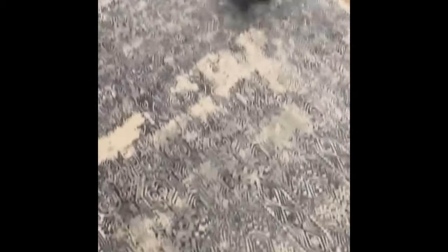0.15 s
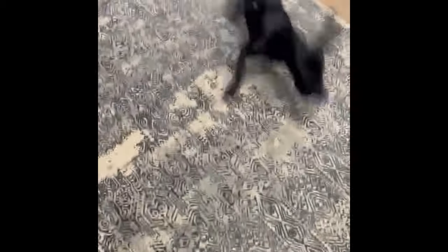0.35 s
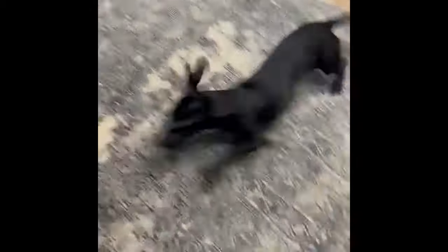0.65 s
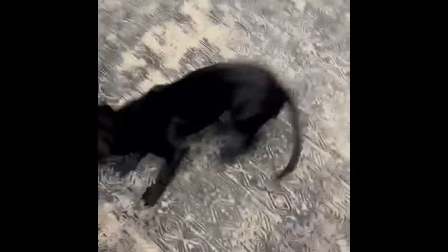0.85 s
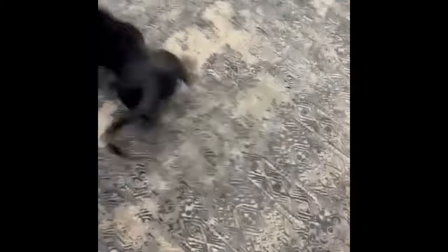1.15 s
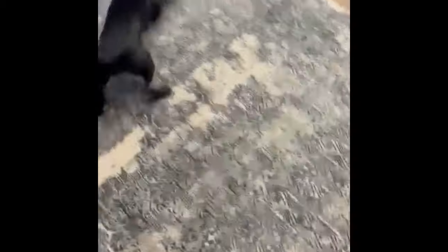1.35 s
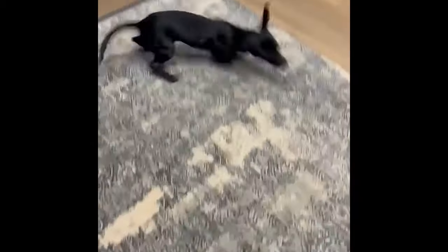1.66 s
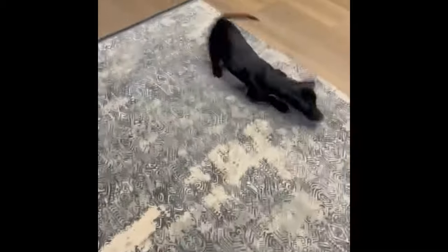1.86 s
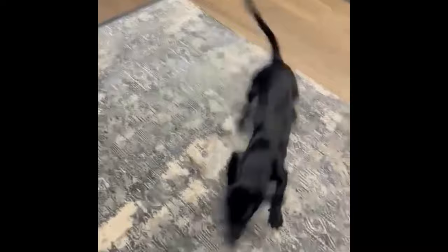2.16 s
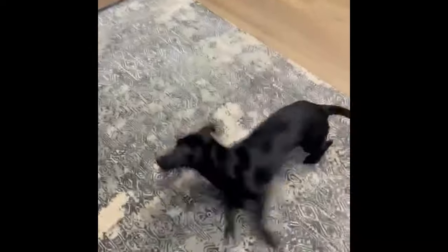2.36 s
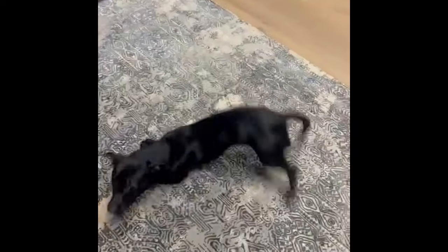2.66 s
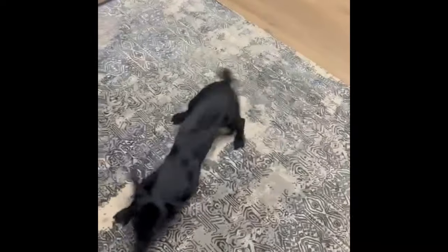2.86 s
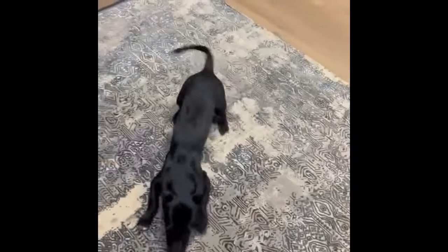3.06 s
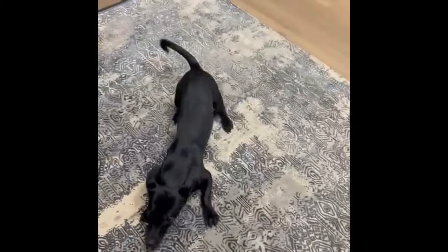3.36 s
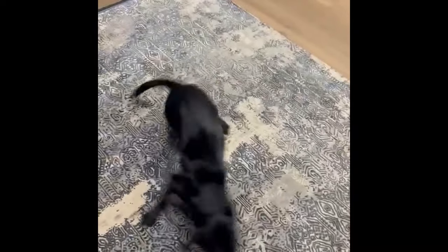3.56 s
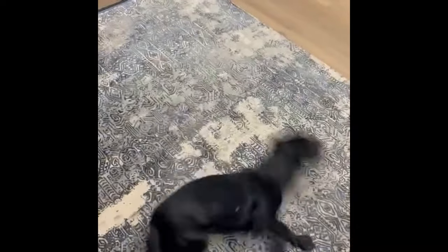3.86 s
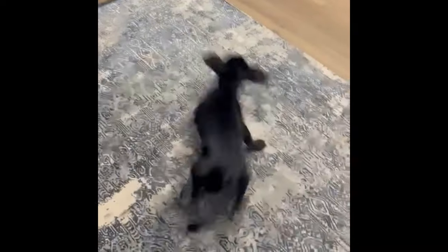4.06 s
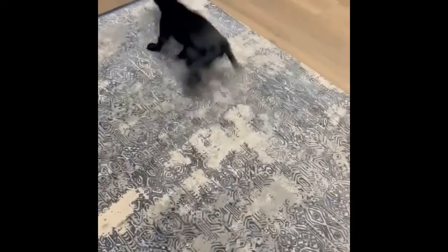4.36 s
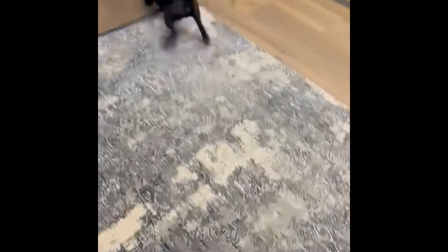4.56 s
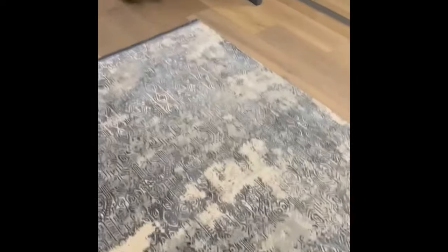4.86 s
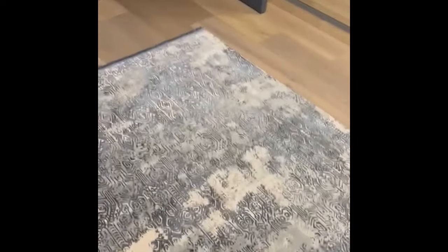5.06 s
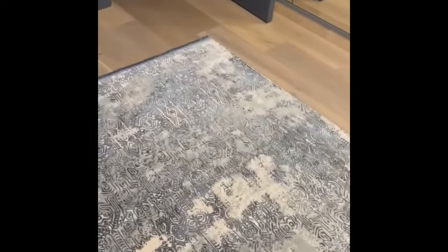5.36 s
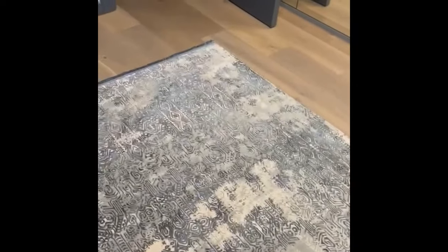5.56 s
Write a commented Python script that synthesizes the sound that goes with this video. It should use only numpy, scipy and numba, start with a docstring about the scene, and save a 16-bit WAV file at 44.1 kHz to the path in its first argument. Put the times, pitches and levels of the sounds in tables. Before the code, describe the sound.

A small puppy plays on a rug in a living room, heard a metre or two from a hand-held phone, with short room echo and faint steady air. Light scuffs and dry claw ticks start at once, quickening from 0.25 to 0.5 s. The first rough growl-bark runs 0.55-1.1 s, raspy, throaty and fluttering. Claws knock between growls. A second, jerky with hard pushes, lasts 1.5-2.1 s; a third, lower, louder and longer, 2.25-2.95 s, ends among three quick ticks near 2.9. From 3 to 3.7 s it is quieter: soft paw thuds, clustered at 3.5-3.65, and faint scuffing. The fourth growl, low and coarse, fills 3.75-4.45 s. Scuffs follow as the puppy runs off, and something thin rustles in bright, crisp bursts, strongest at 4.64 and again at 4.92, then weaker to the end, with tiny bright clicks around 5.5 s.

```python
"""Puppy growling on a rug

A small puppy dashes about in a living room, a metre or two from a hand-held phone.
Its four rough growl-barks are uneven throat pulses and breath ringing chest, mouth and muzzle.
Claws tick as short knocks that ring the floorboards; paws thud softly and scuff the rug as noise.
As it runs off, something thin rustles in bursts of bright noise; room echo and faint air surround it.
"""
import sys
import numpy as np
from scipy import signal
from scipy.fft import rfft, irfft, next_fast_len
from scipy.io import wavfile
from scipy.ndimage import uniform_filter1d
from numba import njit

SR = 44100
rng = np.random.default_rng(int(sys.argv[2]) if len(sys.argv) > 2 else 0)


def unload_audio(sound):
    """Save the sound as a 16-bit wav file, at the path given as the first command line argument."""
    columns = np.transpose(np.atleast_2d(sound))
    # keep every value between -1 and 1, then stretch to whole-number steps
    steps = np.round(np.clip(columns, -1, 1) * 32767)
    wavfile.write(sys.argv[1], SR, steps.astype(np.int16))


N = 251811
TIME_S = np.arange(N) / SR


def growl():
    """Throat pulses and breath ring the head and chest; loose tissue flaps and chops it to a rattle."""
    # One table a growl. Levels after the chest's are relative to it, before the trims below:
    # t/s, chest level/dB, jaw, mouth, muzzle, nose, snarl and treble breath level/dB,
    # jaw f/Hz, mouth f/Hz, nose f/Hz, snarl f/Hz
    growl_paths = [
        [(0.559, -37, -12.5, -4.5, 0, -5.5, -16, -20, 342, 742, 2087, 2975),
         (0.575, -35, 2.5, 0.5, 6, -31.5, -24, -21, 341, 757, 2196, 2967),
         (0.611, -37.5, 11, 3.5, -7.5, -5, -7, -21, 339, 670, 2370, 3100),
         (0.667, -36, -3.5, -2.5, 11, -17.5, -11.5, -16, 348, 732, 2460, 2815),
         (0.729, -32.5, 5, 0.5, -3, -15.5, -25, -28.5, 348, 739, 1990, 3150),
         (0.785, -31.5, 10, -0.5, -8, -17, -22, -26, 384, 712, 2110, 3250),
         (0.857, -34.5, 2.5, 10.5, -2.5, -21, -24.5, -23, 363.8, 715, 2040, 3470),
         (0.935, -35.5, 9.5, 2, -5.5, -13, -20, -22.5, 372.3, 589.4, 2060, 2943),
         (0.989, -36, 0.5, -2.5, -14.5, -11, -45, -24, 376, 726, 2014, 2970),
         (1.057, -39.5, -11, -24, -17, -34, -42, -34, 319, 670, 2040, 2982),
         (1.14, -55.5, 7, -9, -10, -3, -17, -37, 348.3, 667, 2123, 3268)],
        [(1.495, -41.5, 7, 0, -9.5, -27, -16, -19.5, 368, 736, 2082, 2902),
         (1.533, -33, 0.5, -8, -10.5, -21, -27, -25, 352.4, 757, 2017, 3000),
         (1.571, -42, 10.5, 4.5, -1.5, -7.5, -42, -17.5, 350.7, 750, 2075, 2956),
         (1.623, -33.5, -1, -3, -6.5, -17, -11, -23, 350.4, 705, 2533, 2830),
         (1.705, -38, 0.5, 0, -10.5, -10, -23, -21.5, 327, 712, 2048, 3090),
         (1.769, -34.5, 5, 5.5, -7, -12.5, -19, -23.5, 353, 713, 2430, 2960),
         (1.825, -33.5, 3, 15.5, 6, -18, -24, -21, 381, 719, 2154, 2945),
         (1.879, -35, 3.5, 6.5, 1, -11, -27.5, -23, 353.6, 721, 2097, 3050),
         (1.977, -35, 4, 1, -4.5, -13.5, -13.5, -24.5, 342, 690, 2320, 3397),
         (2.033, -43.5, -6.5, -0.5, -7.5, -12.5, -23, -22, 342, 733, 2534, 3314),
         (2.14, -63.5, -8.5, -6.5, 5, 3, 1, -31.5, 355.5, 694, 2375, 2998)],
        [(2.248, -40, 14.5, 13.5, 5, -6.5, -22, -18, 356, 665.6, 2160, 2845),
         (2.268, -32.5, -3.5, 12, 10.5, -10, -29, -19, 354.4, 622, 2240, 2876),
         (2.348, -29, 0.5, 9, 1.5, -8, -18, -22, 388, 672, 2513, 3126),
         (2.386, -37.5, 7.5, 12.5, 12.5, -7, -8, -16.5, 391, 637.6, 2470, 3370),
         (2.42, -34.5, -5.5, 1.5, -5, -12.5, -19, -24.5, 346, 659, 2270, 2960),
         (2.55, -30.5, -5, -2, 1, -14, -9, -26.5, 347, 796, 2300, 2704),
         (2.614, -30.5, 4.5, -3, 5.5, -14, -19, -21.5, 380, 688, 1887, 3736),
         (2.654, -34.5, 2.5, 14.5, 0.5, -8.5, -12, -19, 354, 608, 1870, 3485),
         (2.74, -28.5, -2, -8.5, -11, -21, -25.5, -32, 374, 666, 2195, 3795),
         (2.842, -37, -8.5, -1, -19, -6.5, -17, -26.5, 330, 657, 2018, 3156),
         (3.0, -63, -1.5, 4.5, 7, 3.5, -12, -9, 363.6, 680, 2080, 2923)],
        [(3.754, -39.5, 15, 5, -1, -5, -19, -16, 328.5, 654, 2346, 2960),
         (3.794, -31, -1, 16, -1, -14, -26, -26.5, 356, 713.4, 2378, 3210),
         (3.85, -28, 4, 14, 4, -13, -14.5, -19.5, 375, 601.6, 2074, 3710),
         (3.95, -31.5, -1.5, 12.5, -3.5, -11.5, -23, -20.5, 343, 644, 2090, 3644),
         (4.008, -36.5, 5, 9.5, 7.5, -4.5, -14, -17.5, 371.4, 602, 1940, 3340),
         (4.086, -35.5, 7, 12.5, 1, -10.5, -13.5, -24, 383, 632, 2400, 3290),
         (4.205, -35, -0.5, -1, -4, -9, -12, -24.5, 350, 732, 2236, 2965),
         (4.284, -36, -10.5, -20, -15.5, -24, -27, -26.5, 357, 691, 2200, 3145),
         (4.314, -30, 3, 1, -3, -13.5, -24, -29, 346.5, 675, 2050, 3313),
         (4.382, -41.5, -6.5, -8.5, -5.5, -15, -21, -27.5, 323.7, 717, 2026, 3350),
         (4.45, -54.5, 1, 1, 3, -19, -17, -47, 361, 697, 2077, 3260)],
    ]
    (chest_db, jaw_db, mouth_db, muzzle_db, nose_db, snarl_db, treble_db,
     jaw_hz, mouth_hz, nose_hz, snarl_hz) = read(growl_paths)
    # Moving muzzle resonance as the lips draw back, one table a growl: t/s, f/Hz
    muzzle_path = [
        [(0.57, 1050), (0.654, 1140), (0.716, 986), (0.76, 1062), (0.796, 926), (0.854, 943), (1.0, 1058)],
        [(1.5, 944), (1.552, 926), (1.592, 1081), (1.74, 1005), (1.762, 1080), (2.0, 958)],
        [(2.25, 1010), (2.37, 1070), (2.4, 999), (2.602, 910), (2.78, 1143), (2.85, 1018)],
        [(3.76, 951), (3.798, 994), (3.96, 1030), (4.076, 903), (4.156, 968), (4.214, 1110), (4.4, 974)],
    ]
    muzzle_hz = np.interp(TIME_S, *np.vstack(muzzle_path).T)
    # Fixed chest resonances: f/Hz, width/Hz, level/dB (relative to each other)
    chest_modes = [(199, 78, 3.5), (289.7, 110, 2.5)]
    # Fixed breath resonances in the nose: f/Hz, width/Hz, level/dB (relative to each other)
    nose_modes = [(4380, 340, 2), (6030, 4500, 6.5), (10070, 2900, -28.5)]

    beat, air, rattle, rough, belly_db = throat()
    push_db = surges()
    source = (beat + .6 * rough * air) * rattle * undb(push_db)

    # Low and middle voice; minus signs flip some resonances against the others.
    voice = body(source, chest_modes)
    voice = voice - ring(source, jaw_hz, 97, jaw_db) - ring(source, 89, 80, belly_db)
    voice = voice + ring(source, mouth_hz, 180, mouth_db - .7, patchy_db=1.34)
    # Breath gives the mouth a narrower, more sustained ring beside the pulsed one.
    mouth_breath = air * np.sqrt(rattle) * undb(push_db)
    voice = voice + ring(mouth_breath, mouth_hz, 60, mouth_db - 8, patchy_db=-0.6)
    voice = voice - ring(source, muzzle_hz, 170, muzzle_db - 4, patchy_db=3.0)
    voice = voice - ring(source, 1144, 400, muzzle_db - 3)
    voice_band = signal.butter(3, (85, 1460), "band", fs=SR, output="sos")
    voice = signal.sosfilt(voice_band, voice)

    # Breath through nose and teeth follows the rattle and the pushes less strongly.
    wind = (.2 * beat + air) * np.sqrt(rattle) * undb(.4 * push_db)
    rasp = ring(wind + 0.51 * source, 1613, 490, nose_db - 2.5)
    rasp = rasp + ring(wind, nose_hz, 470, nose_db, patchy_db=4.5)
    rasp = rasp + ring(wind, snarl_hz, 600, snarl_db, patchy_db=5.5)
    treble = undb(treble_db) * unit(sum(ring(wind, *mode) for mode in nose_modes))
    return undb(chest_db) * (voice + rasp + treble)


def throat():
    """Uneven throat pulses, breath strongest just after each pulse, and the flapping tissue's gain."""
    # One row a growl. After its start t/s and end t/s come pairs (value at start, at end):
    # pulse rate f/Hz, roughness (0 to 1), belly level/dB above chest, flap rate f/Hz, flap depth/dB
    throat_rows = [(0.554, 1.138, 185.3, 169.3, 0.6, 0.69, 1.5, -12, 70, 42.11, 3.8, 15),
                   (1.489, 2.141, 174.7, 166, 0.63, 0.63, -12.5, -5, 39.91, 49.94, 5.9, 5.8),
                   (2.249, 3.018, 128.5, 159.9, .55, .65, -15.5, 3.5, 45.63, 45.23, 4.4, 7.2),
                   (3.751, 4.452, 118.7, 125.7, 0.51, 0.77, -12, -16.5, 35.11, 43.67, 3.71, 9.8)]
    rows = np.array(throat_rows)
    times = rows[:, :2].ravel()
    pulse_hz, rough, belly_db, flap_hz, flap_db = (
        np.interp(TIME_S, times, rows[:, k:k + 2].ravel()) for k in range(2, 12, 2))

    # One random pair a pulse: the scatter of its length and of its size.
    chance = rng.uniform(-1, 1, (N // 40, 2)) * [.44, .48]
    beat, phase = pulses(pulse_hz, np.clip(rough, 0, 1), chance)
    air = unit(noise() * (0.11 + np.exp(-phase / 1.1)))

    _, flap = pulses(flap_hz, np.ones(N), rng.uniform(-.4, .4, (N // 40, 2)))
    # The square root makes each flap loud for its first quarter and quiet for the rest.
    rattle = unit(undb(flap_db / 2 * np.sin(2 * np.pi * np.sqrt(flap))))
    return unit(beat), air, rattle, rough, belly_db


def surges():
    """Sudden hard throat pushes: a gain in dB that jumps and dies away, sooner after a hard one."""
    # Pushes inside the growls: t/s, push level/dB (before its quick rise and fall are applied)
    push_rows = [(0.579, 5), (0.656, 1.5), (0.826, 3.5), (0.851, 2.5), (0.949, 4), (1.492, 8), (1.572, 3.5),
                 (1.605, 8.5), (1.747, 13), (1.775, 12), (1.82, 1), (1.895, 5), (2.253, 8.5), (2.292, 13.5),
                 (2.367, 6.5), (2.467, 4.5), (2.655, 14.5), (3.755, 2.5), (3.794, 8), (3.825, 6),
                 (3.942, 3), (4.029, 3), (4.31, 5.5), (4.333, 4.5), (4.355, 6.5), (2.312, 4), (0.68, 4),
                 (3.9, 4), (2.848, 2.5), (2.882, 5), (2.915, 5)]
    soft_s, halves_db = 0.036, 5.5  # fall time of a very soft push; it halves for every so many dB harder
    out, t = np.zeros(N), np.arange(4000) / SR
    for s, db in push_rows:
        fall_s = soft_s * .5 ** (db / halves_db)
        add(out, s, db * np.minimum(t / 0.0071, 1) * np.exp(-(t / fall_s) ** 2))
    return out


@njit
def pulses(hz, rough, chance):
    """One pulse a cycle, and the place within each cycle; roughness scatters length and size."""
    y, phase, p, k = np.zeros(len(hz) + 1), np.empty(len(hz)), 0., 0
    for i in range(len(hz)):
        step = hz[i] * np.exp(rough[i] * chance[k, 0]) / SR
        p += step
        if p >= 1:
            p, k = p - 1, k + 1
            size = np.exp(rough[i] * chance[k, 1])
            # Sharing the pulse between two samples places it between them.
            y[i] += size * p / step
            y[i + 1] += size * (1 - p / step)
        phase[i] = p
    return y[:-1], phase


def body(x, modes):
    """Fixed resonances of alternating sign, like parts of a body ringing side by side."""
    parts = [undb(db) * unit(band(x, hz, width)) for hz, width, db in modes]
    return unit(sum((-1) ** k * part for k, part in enumerate(parts)))


def ring(x, hz, width, db, patchy_db=2.5):
    """A resonance that wanders in pitch and comes and goes on its own."""
    level = undb(db + patchy_db * np.tanh(walk(45)))
    wandering_hz = hz * undb(.35 * walk(40))  # typically about 4 % up or down
    return level * unit(band(x, wandering_hz, width))


def read(tables, fade_s=0.0036):
    """Turns table columns into curves in time; the first, a level, sinks to silence between tables."""
    rows = []
    for table in tables:
        before = (table[0][0] - fade_s, -110, *table[0][2:])
        after = (table[-1][0] + 3 * fade_s, -110, *table[-1][2:])
        rows += [before, *table, after]
    s, *columns = np.transpose(rows)
    return [np.interp(TIME_S, s, column) for column in columns]


def claws():
    """Claws tick: a dry knock rings the floorboards, with a bright crack and a little scrape."""
    # Claw ticks: t/s, level/dB, knock f/Hz, crack level/dB and board ring level/dB (above the tick's)
    ticks = [(0.064, -33.5, 2300, -23, -16), (0.2637, -24.5, 2300, -34, -23.5),
             (0.3766, -22.5, 2120, -14, -5), (0.4381, -21, 2320, -36, -21),
             (0.4703, -17.5, 1500, -45, -13.5), (0.518, -30, 2380, -21, -14),
             (0.791, -15.5, 1910, -34, -27), (0.9536, -21.5, 2650, -16, -20), (1.1632, -14, 1760, -52, -33),
             (1.2303, -23.5, 1820, -41, -26), (1.2472, -27, 2800, -40, -27),
             (1.2797, -18.5, 1810, -47, -34), (1.473, -29, 2230, -33, -23), (1.579, -18, 2400, -25, -28),
             (1.653, -17, 2850, -29, -27), (1.748, -23, 2430, -23, -18), (1.903, -21, 2540, -17, -23),
             (2.209, -19.5, 2136, -38, -20), (2.304, -30, 4570, -1, -37), (2.8524, -17, 2080, -40, -33),
             (2.8842, -15.5, 970, -46, -19), (2.9165, -14, 2480, -55, -19.5),
             (3.052, -23.5, 1260, -41, -34), (3.0726, -25, 1520, -29, -33), (3.699, -23.5, 1450, -24, -39),
             (4.475, -35, 2270, -32, -12), (4.488, -22.5, 2130, -47, -25), (5.48, -26, 5360, -3, -47.5),
             (5.5414, -35.5, 5000, 4, -42), (5.545, -33, 4690, 6, -45)]
    # Floor under the rug: f/Hz, level/dB (relative), time to fall by 60 dB t/s
    board_modes = [(930, -1, 0.021), (1986, 0, 0.022), (3100, -4, .012), (4460, -10, 0.008)]
    out, t = np.zeros(N), np.arange(4000) / SR
    for s, db, hz, crack_db, ring_db in ticks:
        grit = rng.standard_normal(len(t))
        knock = np.sin(2 * np.pi * hz * t) * np.exp(-1.4 * t * hz)
        boards = np.zeros(len(t))
        for (board_hz, board_db, t60), r in zip(board_modes, grit):
            tone = np.sin(2 * np.pi * board_hz * t * (1 + 0.036 * r))  # each tick slightly detuned
            boards += undb(board_db) * tone * 1000 ** (-t / t60)
        scrape_fade = 0.07 * 1000 ** (-t / 0.0017) + 0.041 * 1000 ** (-t / 0.0043)
        scrape = unit(svf(grit, np.full(len(t), 1. * hz), .5 * hz)) * scrape_fade
        crack = undb(crack_db) * svf(grit, np.full(len(t), 6500.), 5000.) * 1000 ** (-t / 0.0035)
        tick = knock + undb(ring_db) * boards + scrape + crack
        add(out, s, undb(db) * tick * np.minimum(t / 0.00042, 1))
    return out


def pads():
    """Paw pads thud softly: a quickly dying tone with a little band of noise around its pitch."""
    # Paw thuds: t/s, level/dB (before the tone's decay), f/Hz
    thuds = [(0.3697, -41.5, 235), (3.05, -37, 686), (3.514, -44, 254), (3.537, -40, 710),
             (3.542, -35, 159), (3.578, -29, 587), (3.6, -37, 407), (3.613, -36.5, 670),
             (3.635, -43.5, 109.4), (3.698, -39.5, 446.8), (4.69, -45, 318), (4.953, -37, 706)]
    out, t = np.zeros(N), np.arange(4000) / SR
    for s, db, hz in thuds:
        grit = rng.standard_normal(len(t))
        pad = np.sin(2 * np.pi * hz * t) * np.exp(-t * hz / 2.5)
        drag = 0.081 * unit(svf(grit, np.full(len(t), 1. * hz), 510.0)) * 1000 ** (-t / 0.023)
        add(out, s, undb(db) * (pad + drag) * np.minimum(t / 0.00036, 1))
    return out


def scuffs():
    """Paws drag over the rug's pile with a hiss, and the floor rumbles."""
    # Drags: peak t/s, scuff level/dB, rise t/s and fall t/s (each over 20 dB),
    # rumble level/dB and hiss level/dB (above the scuff)
    scuff_rows = [(0.0, -50.5, .01, 0.034, 0, -22), (0.121, -46.5, 0.11, 0.065, -1.5, -14),
                  (.31, -60, 0.26, 0.073, -5, -4.5), (0.378, -43.5, 0.0059, 0.039, -4.5, -48),
                  (0.533, -44, 0.15, 0.097, 2.5, -15), (1.188, -60, 0.52, 0.49, -5.5, -29),
                  (1.309, -49.5, 0.14, 0.11, 3, -40), (1.486, -54, 0.025, 0.027, 6, -25),
                  (2.19, -56, 0.13, 0.047, 11.5, -30.5), (2.217, -47.5, 0.018, 0.11, 1.5, -17),
                  (3.002, -62.5, 0.12, 0.19, 8, -44), (3.11, -55.5, 0.093, 0.15, 0.5, -2.5),
                  (3.54, -71, 0.088, 0.046, 16, 4.5), (3.6, -68, 0.051, 0.09, 16, -20),
                  (3.706, -55, 0.13, 0.036, -1.5, -23), (3.744, -55.5, 0.014, 0.022, -1, -13),
                  (4.493, -54, 0.037, 0.088, 7.5, -53), (4.602, -56, 0.06, 0.14, 2, -28),
                  (4.705, -53, 0.048, 0.11, 1.5, 4.5), (4.969, -52, 0.1, 0.16, -2, -12),
                  (5.36, -73.5, 0.225, 0.54, 6, -30)]
    s, db, rise_s, fall_s, rumble_db, hiss_db = np.transpose(scuff_rows)
    drags = swells(s, db, rise_s, fall_s)
    scuff = drags.sum(axis=0) * grainy(1400, 2100, 3, 40)
    rumble = undb(rumble_db) @ drags * grainy(100, 700, 0.94, 31)
    hiss = undb(hiss_db) @ drags * grainy(3700, 7600, 0.7, 25)
    return scuff + rumble + hiss


def rustle():
    """Something thin rustles: bursts of bright, grainy noise with a duller lower edge and airy top."""
    # Bursts: peak t/s, main level/dB, rise t/s and fall t/s (each over 20 dB),
    # centre f/Hz, lower edge level/dB (above the main one)
    rustle_rows = [(4.59, -62, 0.0047, 0.11, 7540, -4), (4.638, -35, 0.022, 0.11, 6400, -12.5),
                   (4.79, -60.5, 0.11, 0.25, 7500, -21), (4.921, -41, 0.037, 0.11, 6500, -9.5),
                   (5.041, -53, 0.15, 0.1, 6200, -4), (5.15, -54.5, 0.041, 0.056, 6450, -8.5),
                   (5.355, -55.5, 0.075, 0.14, 6540, -2), (5.531, -59.5, 0.082, 0.31, 5720, -0.5),
                   (5.643, -54.5, 0.034, 0.15, 6260, 2.5)]
    s, db, rise_s, fall_s, hz, low_db = np.transpose(rustle_rows)
    bursts = swells(s, db, rise_s, fall_s)
    centre_hz = np.interp(TIME_S, s, hz)
    low_grain = grainy(3800 * undb(0.44 * walk(32)), 3900, 2.9, 40) + 0.44 * grainy(4400, 500, 3.7, 22)
    low = undb(low_db) @ bursts * low_grain
    top = undb(-8.5) * (grainy(9200, 4030, 4.0, 31) + 0.51 * grainy(11360, 1100, 2.2, 12))
    main = grainy(centre_hz, 3000, 1.7, 90) + 0.29 * grainy(centre_hz, 450, 4.6, 25)
    return low + bursts.sum(axis=0) * (main + top)


def swells(s, db, rise_s, fall_s):
    """The gain of each event in time: up 20 dB over the rise, down 20 dB over the fall."""
    t = TIME_S - s[:, None]
    slope = np.minimum(t / rise_s[:, None], -t / fall_s[:, None])
    return undb(db[:, None] + 20 * slope)


def grainy(hz, width, flicker_db, rate):
    """Dense tiny slips heard through one broad, flickering resonance."""
    # Each slip lasts 64 samples and has its own random loudness.
    loudness_db = 2.5 * np.minimum(rng.exponential(size=N // 64 + 1), 3)
    grains = undb(loudness_db).repeat(64)[:N]
    return unit(band(noise() * grains, hz, width) * undb(flicker_db * walk(rate)))


def echo(x, t60, bright_hz, count=40):
    """Decaying clouds of reflections of power 1; the puppy moves, so the cloud keeps changing."""
    t, hop = np.arange(int(t60 * SR)) / SR, N // count + 1
    clouds = rng.standard_normal((count + 1, len(t))) * 1000 ** (-t / t60)
    clouds = signal.lfilter([1], [1, -np.exp(-2 * np.pi * bright_hz / SR)], clouds)  # softens treble
    x, out = np.pad(x, (hop, 2 * hop)), np.zeros(N + 4 * hop + len(t))
    window = np.sin(np.pi * np.arange(2 * hop) / (2 * hop))  # overlapping pieces blend smoothly
    for k, cloud in enumerate(clouds):
        piece = x[k * hop:(k + 2) * hop] * window
        add(out, k * hop / SR, signal.fftconvolve(piece, cloud / np.sqrt(np.sum(cloud ** 2))))
    return out[hop:hop + N]


def room_air():
    """Faint, steady background air: white noise coloured by a smooth curve."""
    # Colour of the air: f/Hz, level/dB per Hz (relative; the overall level is set below)
    air_colour = [(15, -32.5), (25, 6.5), (96, 4.5), (323, -5.5), (358, -1), (513, -12), (2480, -13),
                  (5250, -27.5), (6460, -18), (12000, -45.5), (15600, -47), (22000, -120)]
    return undb(-69.5) * unit(shape(noise(), air_colour))


def undb(db):
    """Turns a level in dB into a gain."""
    return 10 ** (np.asarray(db) / 20)


def unit(x):
    """Scales a sound to rms 1."""
    return x / np.sqrt(np.mean(x ** 2))


def noise():
    """White noise: equal strength at every pitch."""
    return rng.standard_normal(N)


def walk(rate):
    """Random levels held for 1 / rate seconds, joined by slopes; spread near 1."""
    hold = int(SR / rate)
    steps = np.repeat(rng.standard_normal(N // hold + 1), hold)
    return unit(uniform_filter1d(steps, hold)[:N])


def add(out, s, burst):
    """Mixes a short sound in at time s, in seconds."""
    i = int(s * SR)
    out[i:i + len(burst)] += burst[:len(out) - i]


@njit
def svf(x, hz, width):
    """A resonance with a moving centre, where its gain is 1 (a state-variable band-pass)."""
    y, b, l = np.empty(len(x)), 0., 0.
    for i in range(len(x)):
        g, k = np.tan(np.pi * hz[i] / SR), width / hz[i]
        v = (b + g * (x[i] - l)) / (1 + g * (g + k))
        b, l, y[i] = 2 * v - b, l + 2 * g * v, k * v
    return y


def band(x, hz, width):
    """A steep resonance: the band-pass twice."""
    hz = np.clip(hz, 20, .45 * SR) * np.ones(N)
    return svf(svf(x, hz, 1. * width), hz, 1. * width)


def shape(x, points):
    """Colours a sound by a curve through (Hz, dB) points."""
    hz, db = np.transpose(points)
    size = next_fast_len(N)
    log_hz = np.log(np.arange(size // 2 + 1) * SR / size + 1)
    gain = undb(np.interp(log_hz, np.log(hz), db))
    return irfft(rfft(x, size) * gain, size)[..., :N]


def scene():
    """Everything in the room; early reflections differ between the two microphone ports."""
    # Strength of the left-right difference under the sum: f/Hz, level/dB
    spread = [(60, -25), (110, -27), (190, -22.5), (350, -10), (630, -3.5), (1130, -6.5), (2020, -17),
              (3640, -8), (6540, -5), (11800, -3)]
    # Balance of the two sides: f/Hz, left minus right level/dB
    lean = [(60, 0.0), (110, -0.5), (190, -2.5), (350, -4.5), (630, -1.5), (1130, 1.0), (2020, 0.0),
            (3640, 0.0), (6540, 0.0), (11800, 0.0)]
    near = growl() + claws() + pads() + scuffs() + rustle()
    mid = near + undb(-10.5) * echo(near, 0.31, 2200) + room_air()
    side = shape(echo(mid, .15, 14000), spread)
    left = shape(mid + side, [(hz, db / 2) for hz, db in lean])
    right = shape(mid - side, [(hz, -db / 2) for hz, db in lean])
    return np.array([left, right])


def record(dry):
    """The phone drops the deepest bass, rounds the loudest peaks and cuts the top."""
    bass_hz, top_hz = 55, 11850
    dry = signal.sosfilt(signal.butter(2, bass_hz, "high", fs=SR, output="sos"), dry)
    soft = .9 * np.tanh(dry / .9)
    return signal.sosfilt(signal.ellip(10, .2, 80, top_hz, fs=SR, output="sos"), soft)


dry = scene()
out = record(dry)
unload_audio(out)
```